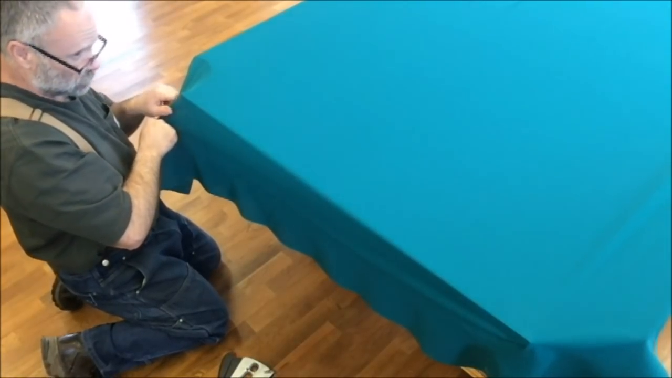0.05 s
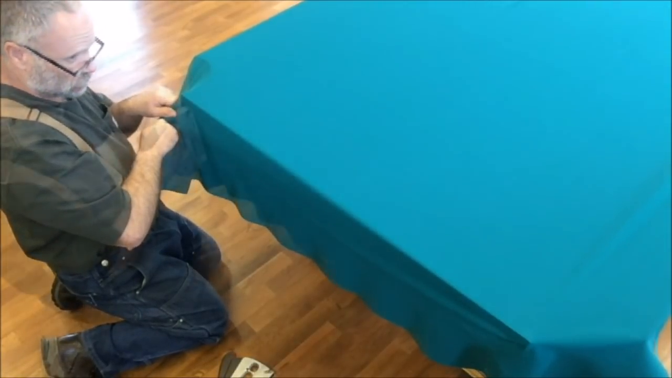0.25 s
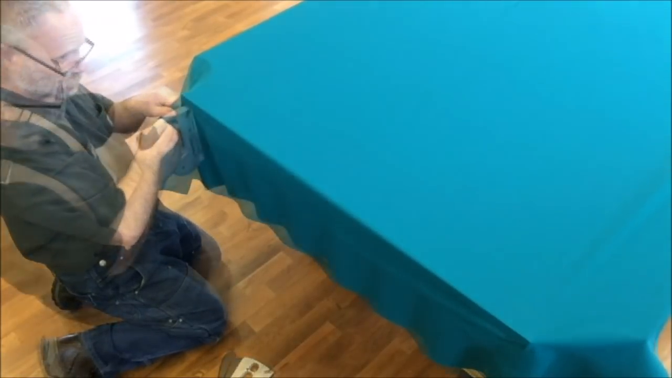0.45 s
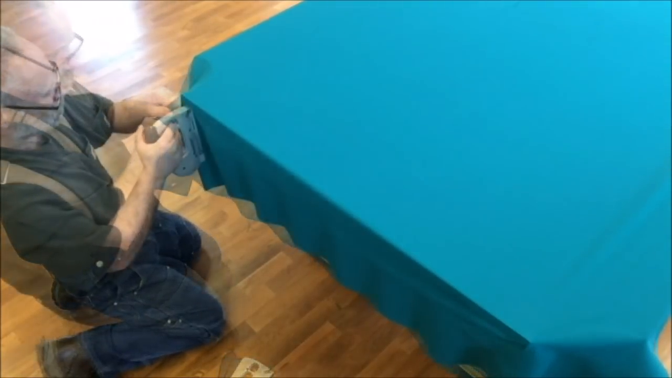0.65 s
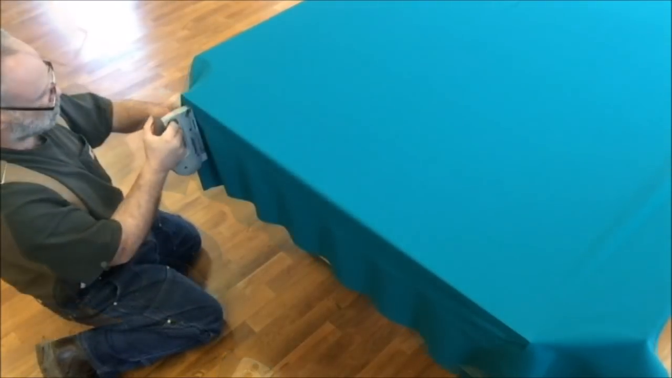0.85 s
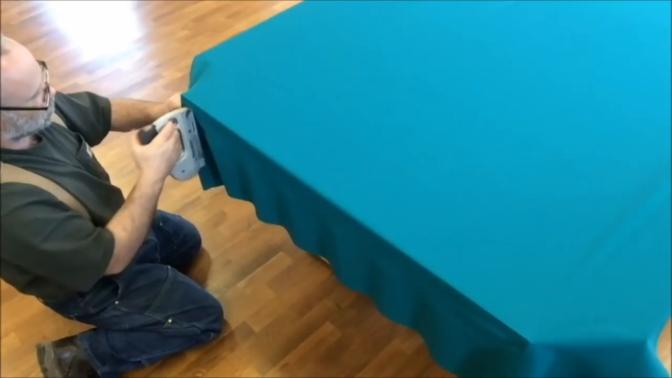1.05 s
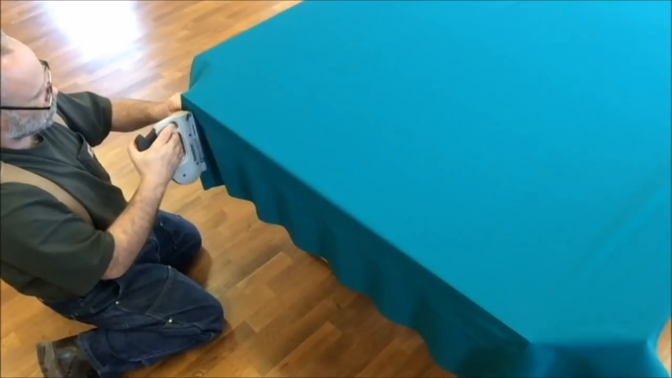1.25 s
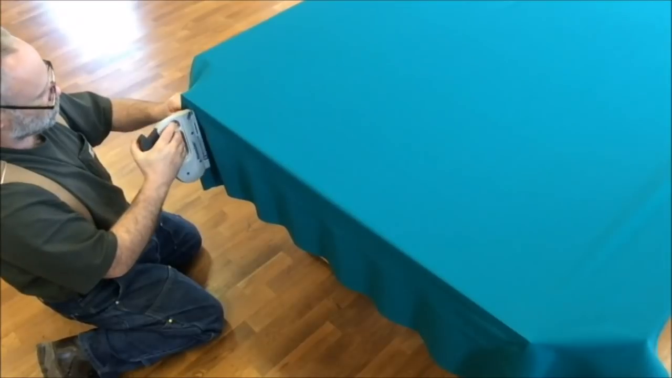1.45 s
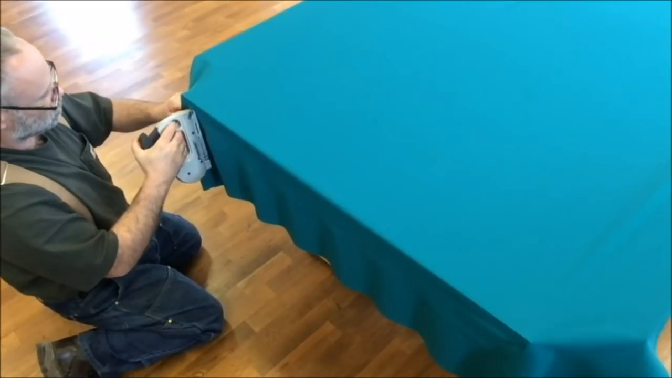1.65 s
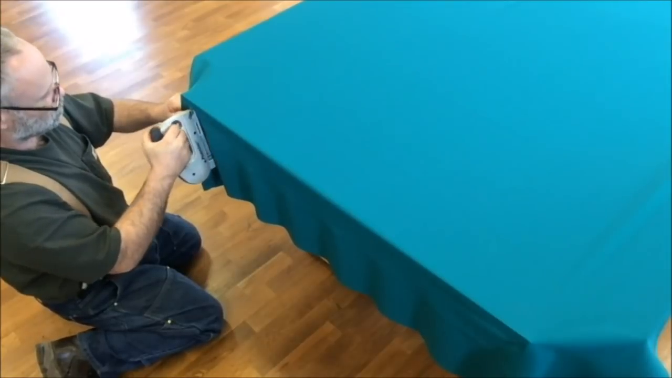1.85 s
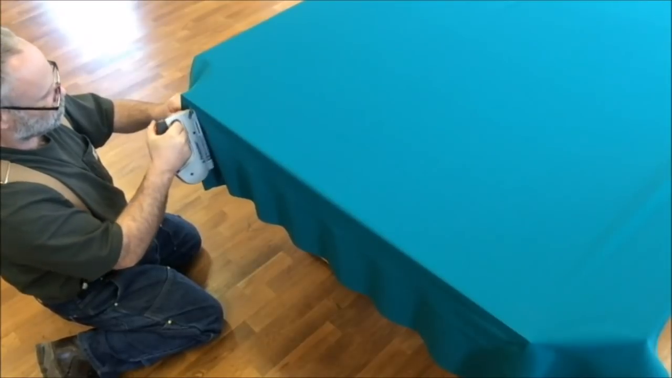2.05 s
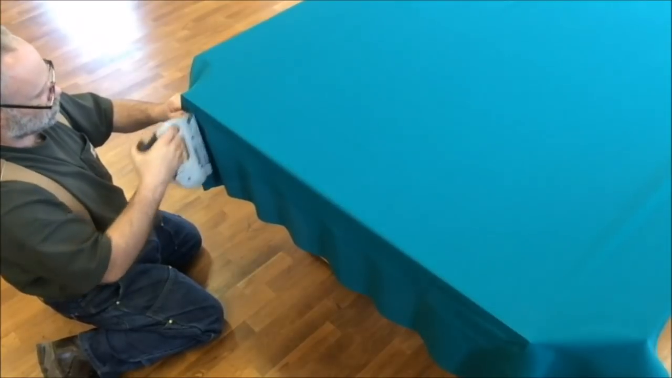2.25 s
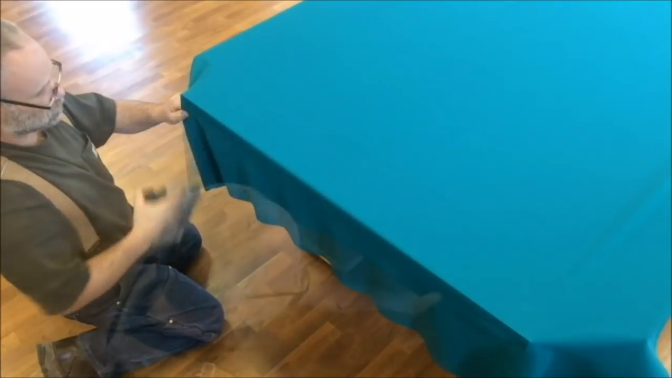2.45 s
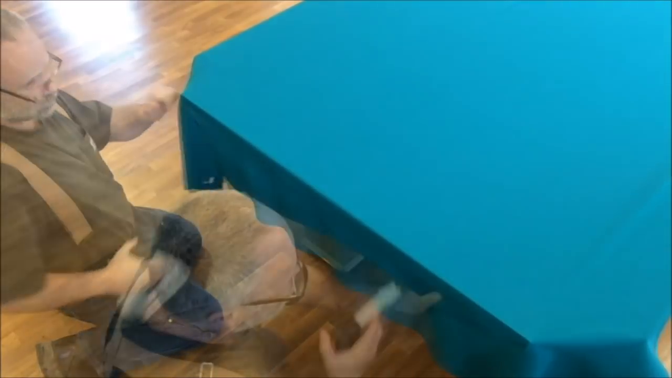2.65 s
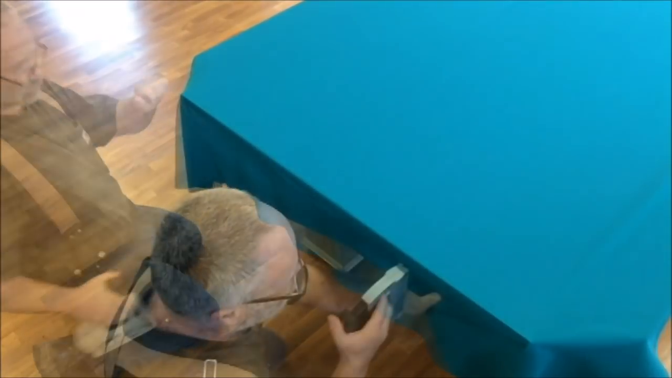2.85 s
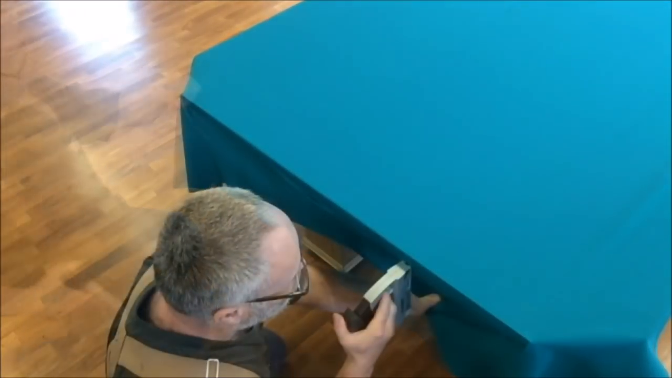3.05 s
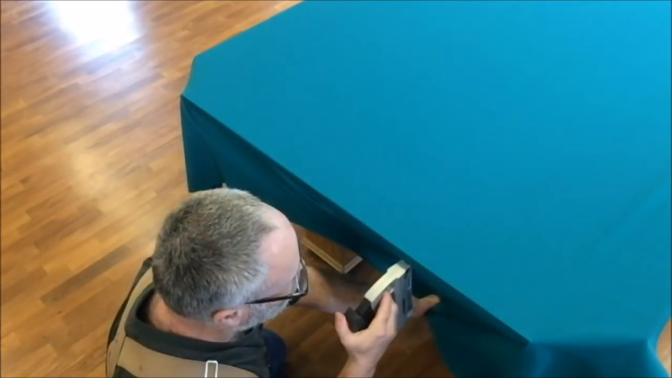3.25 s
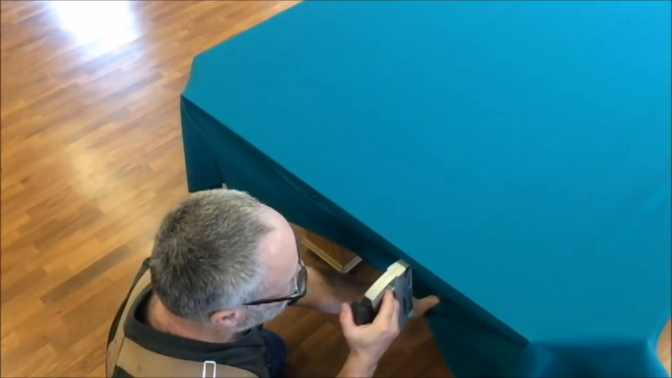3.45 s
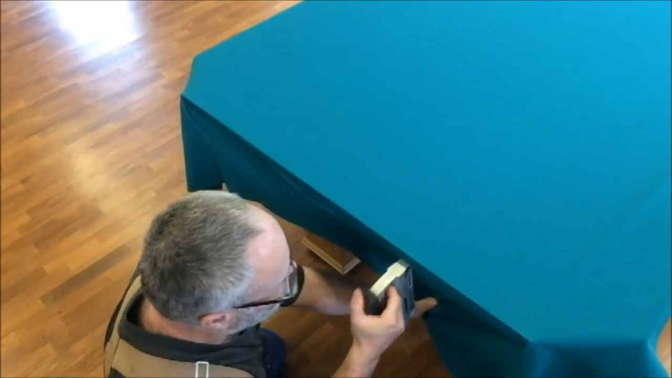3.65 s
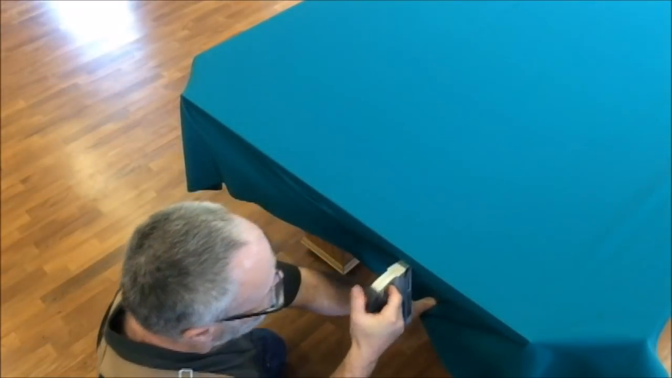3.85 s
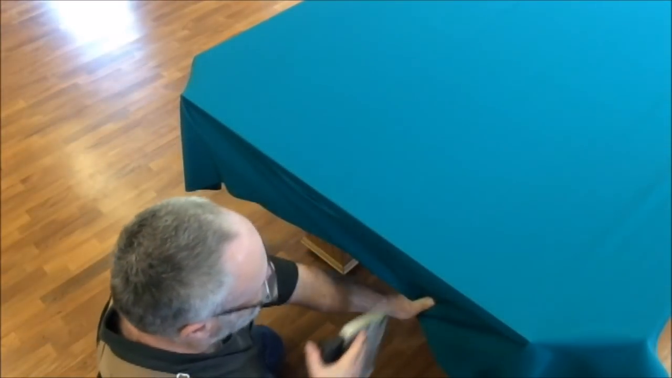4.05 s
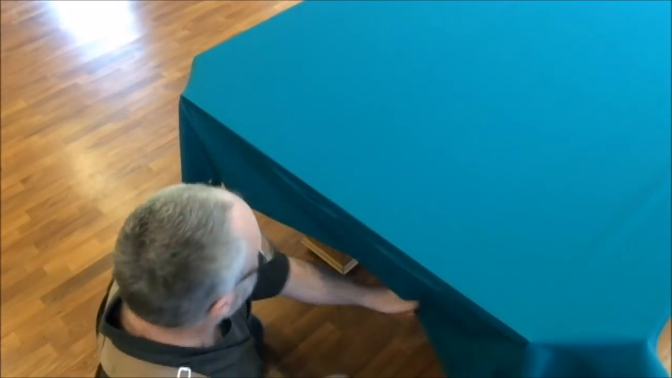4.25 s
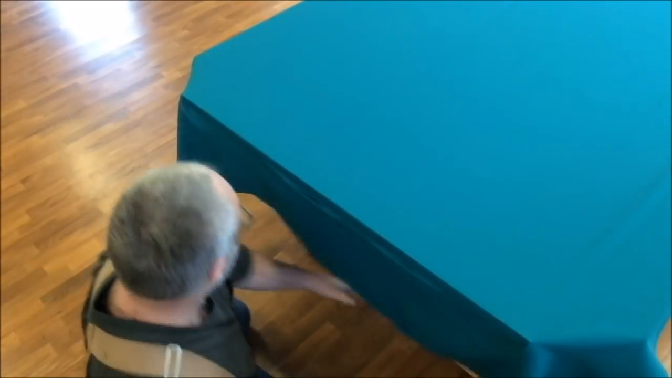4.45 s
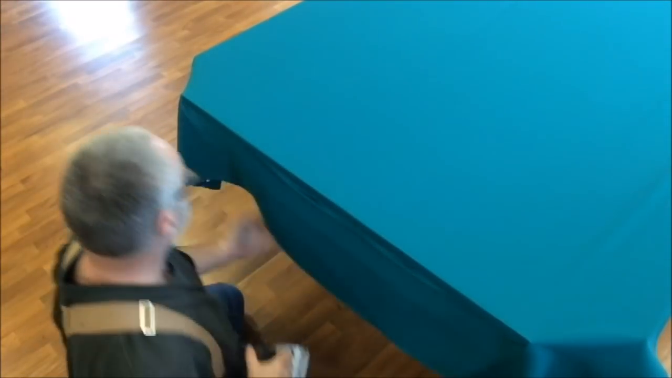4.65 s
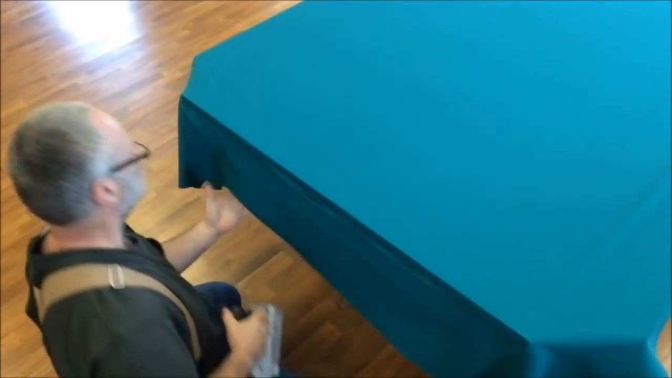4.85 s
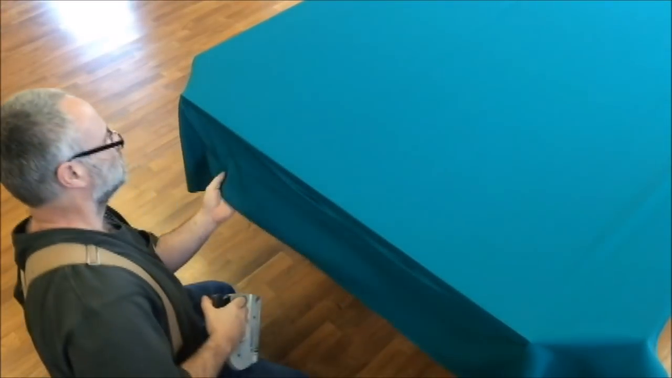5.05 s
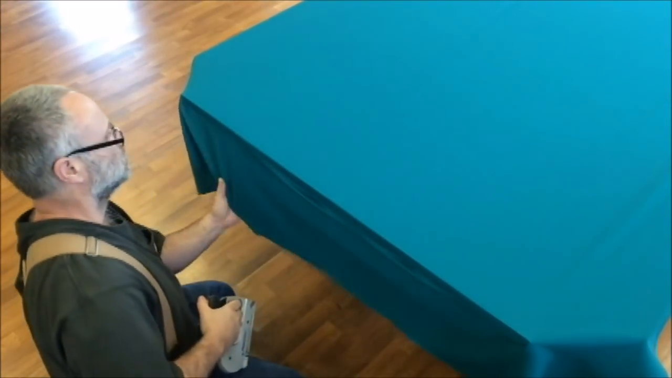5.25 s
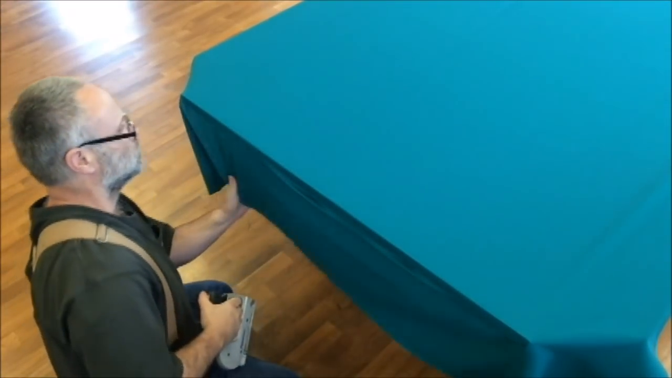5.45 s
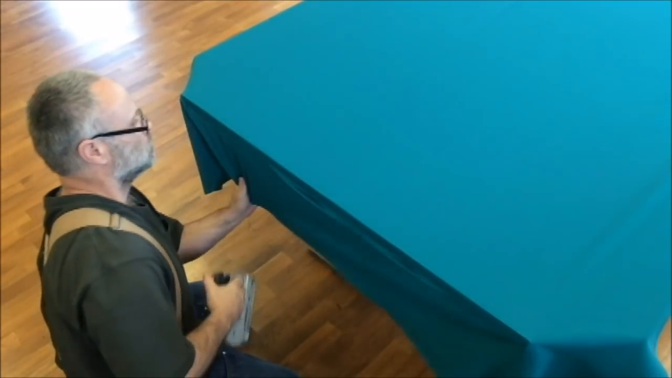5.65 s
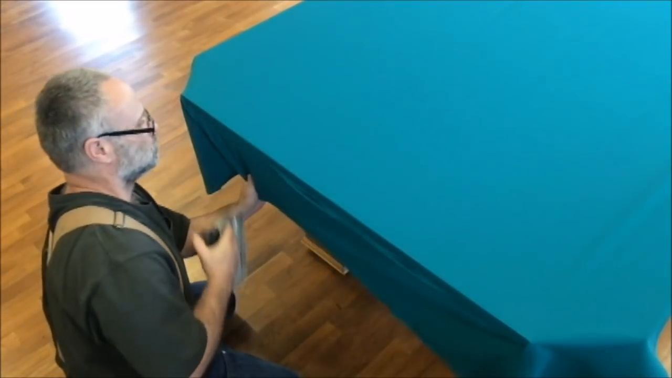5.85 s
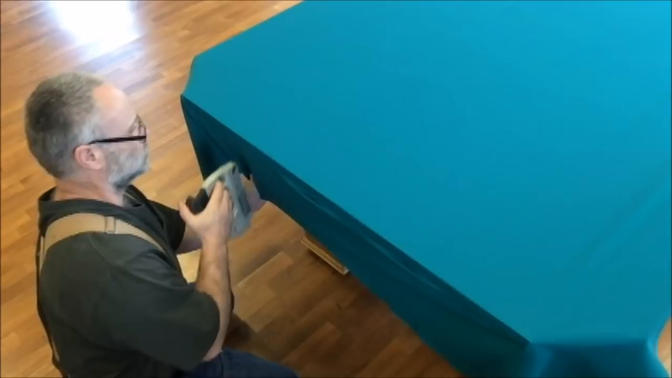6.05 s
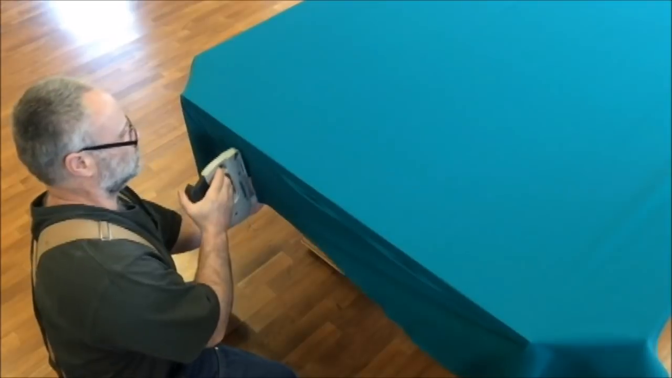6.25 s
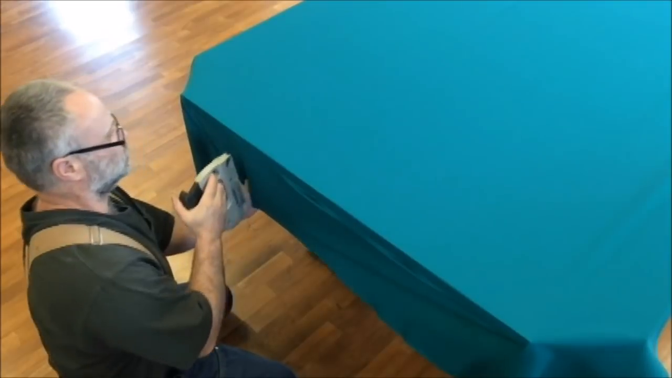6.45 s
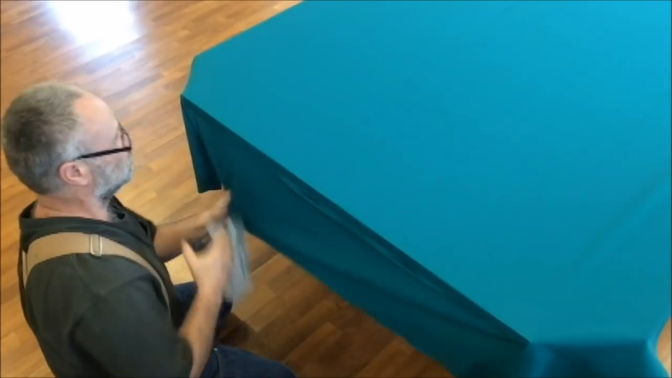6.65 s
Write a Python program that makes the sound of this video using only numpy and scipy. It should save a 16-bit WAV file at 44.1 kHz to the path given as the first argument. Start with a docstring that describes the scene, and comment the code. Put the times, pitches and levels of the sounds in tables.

```python
"""In a live, wood-floored room, a spring staple gun tacks cloth to the wooden edge of a table.
Three times the lever is squeezed, the latch slips, the driver slams a staple home and the lever clatters back.
Between and after the shots a hand strokes the cloth; at the end the gun is set in place again.
Knocks are short noise bursts coloured by resonances, each with room echoes; single tones give thump and wood knock.
The cloth is noise of uneven strength, over still air and a faint hum."""
import sys
import numpy as np
from scipy import signal
from scipy.fft import rfft, irfft
from scipy.io import wavfile

SR = 44100
rng = np.random.default_rng(int(sys.argv[2]) if len(sys.argv) > 2 else 0)


def pcm_store(signal):
    """Save signal as 16-bit PCM."""
    levels = np.round(np.clip(np.atleast_2d(signal), -1, 1) * 32767)
    wavfile.write(sys.argv[1], SR, levels.astype(np.int16).T)


N = 295911

# Staples: (time [s], crack level [dB], crack length [s], thump level before its bass cut [dB],
#           room level [dB], wood knock pitch [Hz], wood knock level [dB])
STAPLE_SHOTS = [(0.9337, -8, 0.007, -13.5, -14.5, 654, -7.5), (2.066, -9, 0.0068, -23.5, -14, 584, -8.5),
                (3.7348, -6.5, 0.01, -14, -15, 537, -8.5)]
# Colour of each shot's crack, one list per shot: (frequency [Hz], level [dB])
CRACK_COLOURS = [
    [(100, -7.5), (300, 3), (750, -2), (1000, 4), (1600, -13.5), (2300, 2), (3200, -22.5), (7500, -16.5),
     (16000, -14.5)],
    [(100, -19), (180, 0), (500, -9), (850, -6.5), (1000, 1), (1900, -0.5), (3000, -9.5), (6000, -13),
     (16000, -15)],
    [(100, -9), (330, 4), (850, -10.5), (1200, -3), (1800, -5), (2400, -5), (3800, -4), (6000, -13.5),
     (7500, -8), (9000, -12.5), (16000, -6)],
]
# Colour of what gun and table send into the room, one list per shot: (frequency [Hz], level [dB])
ROOM_COLOURS = [
    [(90, -30), (140, -10.5), (400, -7.5), (750, -3.5), (950, 7), (1700, -0.5), (3200, -2.5), (6000, -2.5),
     (10500, -4.5), (16000, -13)],
    [(90, -24), (140, 0), (400, -7.5), (750, -3), (1100, 3.5), (2000, -1), (3200, -4), (6000, -4.5),
     (10500, -4.5), (16000, -15)],
    [(90, -18), (140, 0.5), (400, 3.5), (750, -2), (1200, 2.5), (1700, 1), (3400, -6), (6000, -3),
     (10500, -2), (16000, -8.5)],
]
# Resonances of the wooden edge, one list per shot: (frequency [Hz], width [Hz], boost [dB])
WOOD_RESONANCES = [
    [(353, 13, 10), (526, 16, 4), (1120, 47, 7.5), (2144, 98, 10.5)],
    [(350, 14, 12), (478.3, 15, 9.5), (1290, 25, 5.5), (1640, 15, 8.5), (1887, 37, 9.5), (2060, 30, 12.5)],
    [(330, 22, 12.5), (520, 15, 12.5), (1100, 22, 11), (3740, 260, 8.5), (7520, 670, 3)],
]
# Resonances of the gun's steel body: (frequency [Hz], width [Hz], boost [dB])
STEEL_RESONANCES = [(3180, 7.4, 5.5), (3470, 30, 6.5), (4220, 23, 7), (5200, 11, 3.5), (6900, 13, 5.5),
                    (7660, 220, 5), (11440, 120, 6.5)]

# The table board hums on after the last staple: (time [s], pitch [Hz], level [dB])
BOARD_HUMS = [(3.7353, 184.6, -36), (3.899, 190, -33), (4, 202, -41)]

# The lever knocks in its frame:
# (time [s], level [dB], length [s], main resonance [Hz], damping by the grip [1 = free])
LEVER_KNOCKS = [(.914, -48, .012, 1200, 3), (1.217, -29.5, .012, 1290, 3.2), (1.467, -51, .012, 1350, 2.5),
                (2.050, -36, .016, 1250, 3), (2.379, -27.5, .018, 1340, 3.8), (3.710, -36, .012, 1400, 4),
                (3.999, -16.5, .007, 1410, 1.7)]
# Colour of a lever knock: (frequency [Hz], level [dB])
LEVER_COLOUR = [(80, -24.5), (190, -13), (800, -7), (1200, 2), (2200, -0.5), (4000, -5), (8000, -8.5),
                (16000, -10)]
# Width and boosts of an undamped lever; the overtone is a multiple of the main resonance
LEVER_WIDTH_HZ, LEVER_BOOST_DB, OVERTONE_RATIO, OVERTONE_BOOST_DB = 85, 16, 1.52, 15.5

# The latch slips just before each shot: (time [s], level [dB], length [s])
LATCH_SLIPS = [(.9243, -26.5, 0.0083), (2.052, -32, 0.016), (3.727, -21, 0.0027)]
# The spring creaks under load: (time [s], level [dB])
SPRING_CREAKS = [(3.657, -48), (3.687, -45)]
CREAK_S = 0.0028
# The lever is let go and the latch drops back over the driver in two clicks:
# (time [s], first click level [dB], second click level [dB])
LATCH_RESETS = [(1.177, -30, -39), (2.3412, -30, -25.5), (3.969, -23.5, -22.5)]
RESET_GAP_S, RESET_FIRST_S, RESET_SECOND_S = 0.0185, 0.01, 0.004
# Loose rattles of the released lever: (time [s], level [dB], length [s])
LEVER_RATTLES = [(1.238, -25, 0.0053), (1.47, -55, 0.0055)]
# Colour of the sharp metal ticks: (frequency [Hz], level [dB])
TICK_COLOUR = [(100, -16), (600, -7), (1400, 3), (3000, -3.5), (5500, -3), (7500, -1), (9500, -7),
               (16000, -2.5)]

# The nose is pressed home as the lever takes up its slack: (time [s], level [dB], length [s])
NOSE_PRESSES = [(.7995, -42, .011), (1.957, -37.5, .012), (3.5155, -31.5, .006)]
# Colour of a press: (frequency [Hz], level [dB])
PRESS_COLOUR = [(60, -14), (200, -9), (480, -5), (850, -11.5), (1200, 4), (2200, -4.5), (3500, -7.5),
                (7000, -16), (16000, -24.5)]
# Resonances of the nose: (frequency [Hz], width [Hz], boost [dB])
NOSE_RESONANCES = [(1080, 380, 14.5), (1750, 170, 6.5)]
SETTLE_DELAY_S, SETTLE_CHANGE_DB = 0.031, -15   # the nose settles once more, softer

# Soft bumps of hand and gun on the table: (time [s], level [dB], length [s])
TABLE_BUMPS = [(4.965, -57.5, 0.031), (5.142, -55, 0.011), (5.832, -55, 0.011), (5.893, -55, 0.014),
               (6.42, -52.5, 0.015), (6.634, -51.5, 0.0098)]
# Colour of a bump: (frequency [Hz], level [dB])
BUMP_COLOUR = [(60, -10), (340, 12.5), (600, 2), (1500, -4), (16000, -23)]

# The cloth snags and lets go: (time [s], level [dB], length [s])
CLOTH_SNAGS = [(5.493, -48, 0.009), (5.5566, -38.5, 0.0039), (6.0732, -49, 0.0042), (6.1059, -48.5, .004),
               (6.2441, -46, 0.0023)]
# Colour of a snag: (frequency [Hz], level [dB])
SNAG_COLOUR = [(100, -11), (350, 4), (700, -1), (2000, 4), (4000, -4), (7500, -19.5), (16000, -21)]
# The gun drags over the cloth, catching again and again; the spreads are standard deviations
DRAG_START_S, DRAG_END_S, DRAG_DB = 6.273, 6.45, -48
CATCH_EVERY_S, CATCH_S, CATCH_JITTER_S, CATCH_SPREAD_DB = 0.04, 0.004, 0.000986, 1.0

# Strokes of the hand over cloth:
# (start time [s], length before fading [s], low rub level [dB], high swish level [dB])
HAND_STROKES = [(0.036, 0.094, -67.5, -71.5), (1.607, 0.53, -67.5, -74), (3.356, 0.44, -62, -73),
                (4.2, 0.48, -58.5, -60.5), (4.851, 0.22, -65.5, -65), (5.127, 0.46, -53.5, -63.5),
                (6.042, 0.09, -60.5, -64.5), (6.247, 0.17, -57.5, -59.5)]
# Colour of the dull rub: (frequency [Hz], level [dB])
RUB_COLOUR = [(30, -16), (90, -10), (180, -1.5), (330, -2), (600, -5), (1500, -9), (4000, -37)]
# Colour of the swish: (frequency [Hz], level [dB])
SWISH_COLOUR = [(800, -14.5), (1700, 1), (3500, -6.5), (7500, -11), (8500, -15.5), (16000, -20.5)]
STROKE_ATTACK_S, STROKE_RELEASE_S = 0.015, 0.11

# Colour of the still room air: (frequency [Hz], level [dB])
AIR_COLOUR = [(25, -24), (70, -9), (250, -11), (500, -11.5), (1100, -15), (2700, -26), (16000, -36)]
AIR_DB, HUM_HZ, HUM_DB = -67.5, 242.5, -78.5

# Time the room's echoes take to fall by 60 dB: (frequency [Hz], decay time [s])
ROOM_DECAY = [(60, 1), (170, 0.73), (450, .6), (1300, 0.61), (4000, 0.53), (8000, .48), (12000, 0.36),
              (16000, 0.33)]
ROOM_BUILD_S, ROOM_HOLD_S = 0.004, 0.025
ECHO_CLUMP_DB, ECHO_CLUMPS_PER_S = 1.27, 92   # uneven strength of the echoes

CUTOFF_HZ = 16000   # top of the audible range kept here


def staples(thump_hz, thump_s, thump_cut_hz, knock_s):
    """The driver cracks on the staple; the wood knocks, the table thumps, the steel rings, the room answers."""
    out = np.zeros(N)
    # Slow motion radiates little sound, so the deep part of the thump is cut
    bass_cut = signal.butter(2, thump_cut_hz, "high", fs=SR, output="sos")
    thump = signal.sosfilt(bass_cut, ring(thump_hz, thump_s))
    shots = zip(STAPLE_SHOTS, CRACK_COLOURS, ROOM_COLOURS, WOOD_RESONANCES)
    for shot, crack_colour, room_colour, wood in shots:
        s, crack_db, length, thump_db, room_db, knock_hz, knock_db = shot
        steel = STEEL_RESONANCES + overtones()
        crack = body(chatter(length), crack_colour, steel)
        wood_knock = ring(knock_hz, knock_s)
        echoes = body(room_tail(), room_colour, steel + wood)
        add(out, s, from_db(crack_db) * crack)
        # Minus: thump and wood knock first swing the negative way
        add(out, s, -from_db(thump_db) * thump - from_db(knock_db) * wood_knock)
        add(out, s, from_db(room_db) * echoes)
    return out


def board(decay_s, swell_s):
    """The jolt spreads into the table top, whose low tone swells and dies away."""
    out = np.zeros(N)
    for s, hz, db in BOARD_HUMS:
        swelling_tone = ring(hz, decay_s) - ring(hz, swell_s)
        add(out, s, from_db(db) * swelling_tone)
    return out


def lever(wet_db):
    """The hollow lever knocks with two resonances; a tight grip makes them wider and weaker."""
    out = np.zeros(N)
    for s, db, length, hz, damping in LEVER_KNOCKS:
        width = LEVER_WIDTH_HZ * damping
        loss_db = 10 * np.log10(damping)
        main = (hz, width, LEVER_BOOST_DB - loss_db)
        overtone = (hz * OVERTONE_RATIO, width, OVERTONE_BOOST_DB - 2 * loss_db)
        knock = body(contact(length, wet_db), LEVER_COLOUR, [main, overtone] + overtones())
        add(out, s, from_db(db) * knock)
    return out


def ticks():
    """Sharp metal contacts of spring, latch and lever, as rows of (time [s], level [dB], length [s])."""
    rows = LATCH_SLIPS + LEVER_RATTLES
    rows = rows + [(s, db, CREAK_S) for s, db in SPRING_CREAKS]
    for s, first_db, second_db in LATCH_RESETS:
        first = (s, first_db, RESET_FIRST_S)
        second = (s + RESET_GAP_S, second_db, RESET_SECOND_S)
        rows = rows + [first, second]
    return rows


def presses():
    """Each press of the nose and its softer settling, as rows of (time [s], level [dB], length [s])."""
    settling = [(s + SETTLE_DELAY_S, db + SETTLE_CHANGE_DB, length) for s, db, length in NOSE_PRESSES]
    return NOSE_PRESSES + settling


def slips():
    """Snags, then stick and slip under the dragged gun, as rows of (time [s], level [dB], length [s])."""
    times = np.arange(DRAG_START_S, DRAG_END_S, CATCH_EVERY_S)
    chances = rng.standard_normal((len(times), 2))
    catches = []
    for s, (late, firm) in zip(times, chances):
        catches.append((s + CATCH_JITTER_S * late, DRAG_DB + CATCH_SPREAD_DB * firm, CATCH_S))
    return CLOTH_SNAGS + catches


def touches(rows, colour, resonances, wet_db):
    """A series of contacts on one body, which colours them all alike."""
    out = np.zeros(N)
    for s, db, length in rows:
        add(out, s, from_db(db) * contact(length, wet_db))
    return body(out, colour, resonances)


def cloth():
    """A dull rub from the table beneath and a grainy swish from the weave."""
    motion = np.array([stroke(start, length) for start, length, _, _ in HAND_STROKES])
    levels = from_db(np.array(HAND_STROKES)[:, 2:].T)
    # Overlapping strokes add up in power
    low, high = np.sqrt(levels ** 2 @ motion ** 2)
    rub = low * body(friction(grain_db=2.5, grains_per_s=74), RUB_COLOUR)
    swish = high * body(friction(grain_db=3.5, grains_per_s=190), SWISH_COLOUR)
    return rub + swish


def stroke(start, length):
    """The hand gets moving, slides evenly and slows to rest."""
    age = np.arange(N) / SR - start
    rise = np.clip(age / STROKE_ATTACK_S, 0, 1)
    fade = np.exp(-np.maximum(age - length, 0) / STROKE_RELEASE_S)
    return rise * fade


def friction(grain_db, grains_per_s):
    """Noise whose strength varies quickly as fibres catch and slide."""
    strength = from_db(grain_db * wander(grains_per_s, N))
    return rms_one(rng.standard_normal(N) * strength)


def contact(length, wet_db):
    """One touch and its reverberation; a longer touch puts more energy into the room."""
    sound = room_tail() * from_db(wet_db) * np.sqrt(length / ROOM_HOLD_S)
    direct = chatter(length)
    sound[:len(direct)] += direct
    return sound


def chatter(length, size=4096):
    """Parts in contact rattle densely for a few milliseconds, exciting all pitches about equally."""
    t = np.arange(size) / SR
    grip = np.exp(-(t / length) ** 3)
    spectrum = rfft(grip * rng.standard_normal(size))
    even_noise = irfft(spectrum / (np.abs(spectrum) + 1e-9))   # same strength at every pitch
    burst = even_noise * np.sqrt(grip)
    return rms_one(burst) * np.sqrt(np.mean(grip ** 2))


def overtones(count=28, width_hz=55, db=7):
    """Spring, rail and casing add narrow random resonances: (frequency [Hz], width [Hz], boost [dB])."""
    edges = np.geomspace(2400, CUTOFF_HZ, count + 1)
    pitches = rng.uniform(edges[:-1], edges[1:])
    # width_hz holds at the lowest edge; higher resonances are wider
    return [(hz, width_hz * np.sqrt(hz / edges[0]), db) for hz in pitches]


def ring(hz, decay_s):
    """One struck tone that dies away."""
    t = np.arange(SR) / SR
    return np.sin(2 * np.pi * hz * t) * np.exp(-t / decay_s)


def body(x, colour, resonances=(), size=16384):
    """An object colours a sound: a filter of unit power gain with a broad colour and ringing resonances."""
    hz = np.arange(size // 2 + 1) * SR / size
    bass_cut = hz ** 2 / (hz ** 2 + 30 ** 2)
    gain = from_db(at_hz(colour, hz)) * bass_cut
    for centre, width, db in resonances:
        peak = (from_db(db) ** 2 - 1) / (1 + (2 * (hz - centre) / width) ** 2)
        gain = gain * np.sqrt(1 + peak)
    # Folding the cepstrum gives a filter that never sounds before it is struck (minimum phase)
    cepstrum = irfft(np.log(rms_one(gain) + 1e-4))
    cepstrum[1:size // 2] *= 2
    cepstrum[size // 2 + 1:] = 0
    response = irfft(np.exp(rfft(cepstrum)))
    return signal.fftconvolve(x, response)[:len(x)]


def room_tail(count=14):
    """The room's answer to one click: dense echoes that build, hold, and die sooner in the treble."""
    t, hz = np.arange(SR) / SR, np.arange(SR // 2 + 1)
    white = rfft(rng.standard_normal(SR))
    centres = np.geomspace(60, 16000, count)
    age = np.hypot(t, ROOM_HOLD_S) - ROOM_HOLD_S   # starts slowly, so the echoes hold at first
    tail = 0
    for centre, share in zip(centres, np.eye(count)):   # one overlapping band at a time
        band = irfft(white * at_hz(np.c_[centres, share], hz), SR)
        tail = tail + band * np.exp(-np.log(1000) * age / at_hz(ROOM_DECAY, centre))
    build = 1 - np.exp(-t / ROOM_BUILD_S)
    clumps = from_db(ECHO_CLUMP_DB * wander(ECHO_CLUMPS_PER_S, SR))
    return tail * build * clumps


def wander(per_s, size):
    """Random values, per_s of them a second, joined by straight lines."""
    steps = rng.standard_normal(size // 10)
    return np.interp(np.arange(size) / SR * per_s, np.arange(len(steps)), steps)


def from_db(db):
    """Turn decibels into a gain."""
    return 10 ** (np.asarray(db) / 20)


def rms_one(x):
    """Scale to unit power."""
    return x / np.sqrt(np.mean(x ** 2) + 1e-20)


def at_hz(points, hz):
    """Read a table between its points, with frequency on a log scale."""
    f, value = np.transpose(points)
    return np.interp(np.log(np.maximum(hz, 1)), np.log(f), value)


def add(out, s, sound):
    """Mix a sound in at time s, in seconds."""
    at = round(s * SR)
    out[at:at + len(sound)] += sound[:N - at]


def background():
    """Still room air, as coloured noise, with a faint steady hum."""
    air = body(rng.standard_normal(N), AIR_COLOUR)
    hum = np.sqrt(2) * np.sin(2 * np.pi * HUM_HZ * np.arange(N) / SR)   # unit power
    return from_db(AIR_DB) * air + from_db(HUM_DB) * hum


def scene():
    """The gun, the hands and the room at one microphone; wet_db sets how strongly the room answers."""
    gun = staples(thump_hz=55, thump_s=0.0092, thump_cut_hz=120, knock_s=0.0052)
    gun += board(decay_s=0.081, swell_s=0.016)
    gun += lever(wet_db=-6.5)
    gun += touches(ticks(), TICK_COLOUR, STEEL_RESONANCES + overtones(), wet_db=-5.5)
    gun += touches(presses(), PRESS_COLOUR, NOSE_RESONANCES + overtones(), wet_db=-9.5)
    hands = touches(TABLE_BUMPS, BUMP_COLOUR, [], wet_db=-2.5)
    hands += touches(slips(), SNAG_COLOUR, [], wet_db=-7.0)
    hands += cloth()
    return (gun + hands + background())[None]


def record(dry):
    """The cracks overload the microphone a little; the deepest bass and the top are cut."""
    top = 1.2   # the level that loud peaks bend towards
    rounded = top * np.tanh(dry / top)
    bass_cut = signal.butter(2, 32, "high", fs=SR, output="sos")
    top_cut = signal.ellip(10, 0.2, 90, CUTOFF_HZ, fs=SR, output="sos")
    return signal.sosfilt(top_cut, signal.sosfilt(bass_cut, rounded))


dry = scene()
out = record(dry)
pcm_store(out)
```